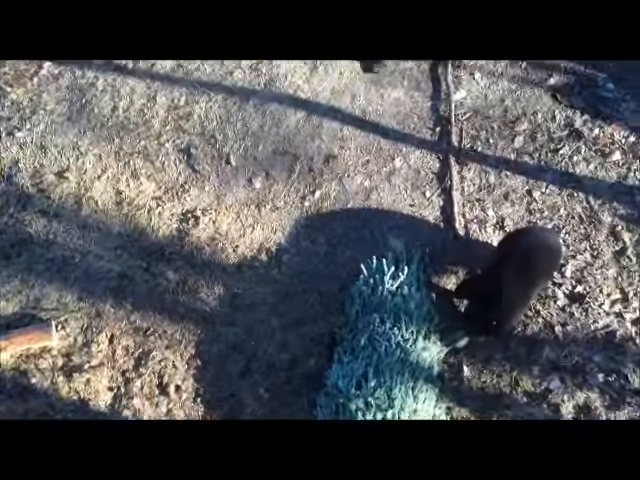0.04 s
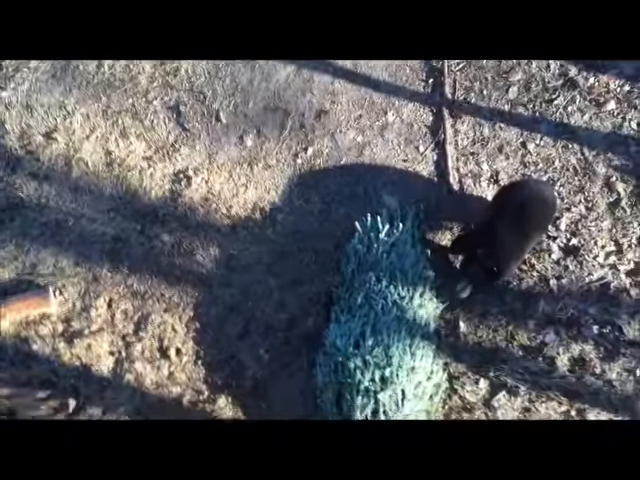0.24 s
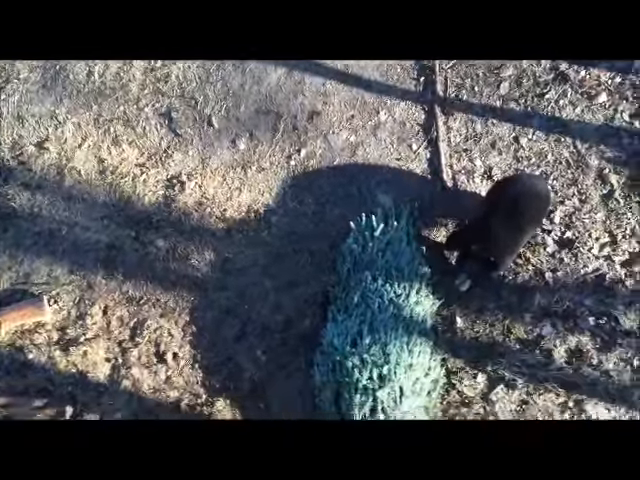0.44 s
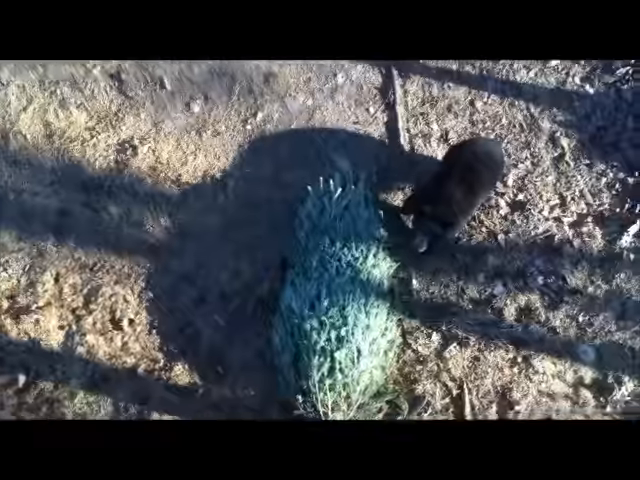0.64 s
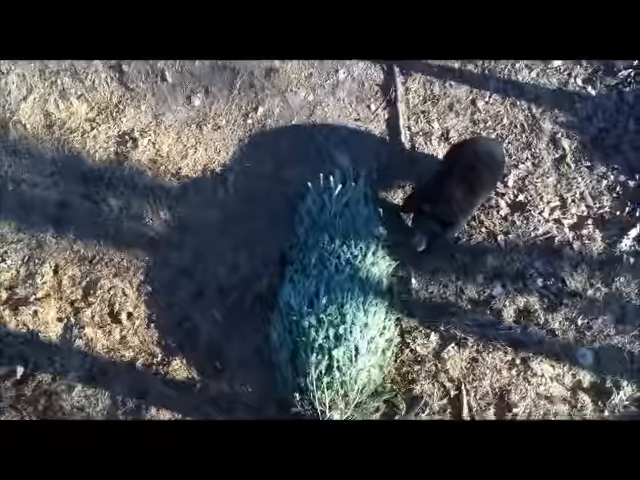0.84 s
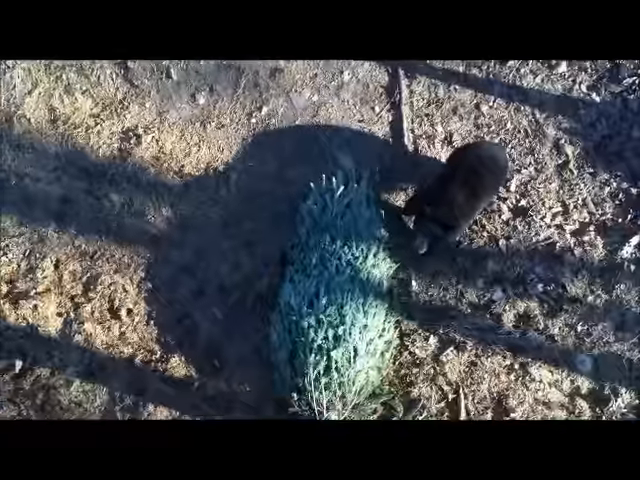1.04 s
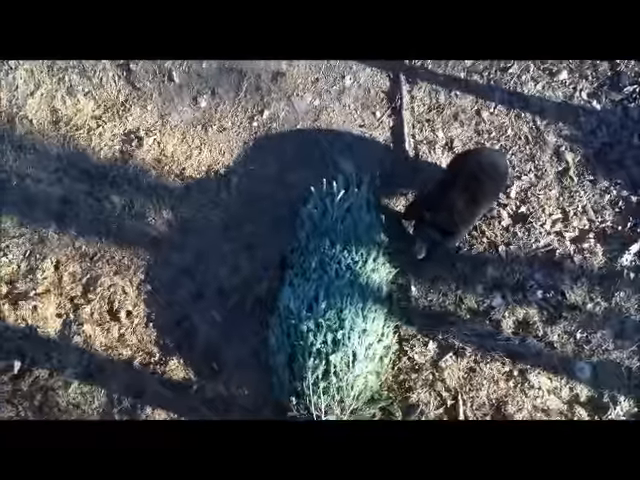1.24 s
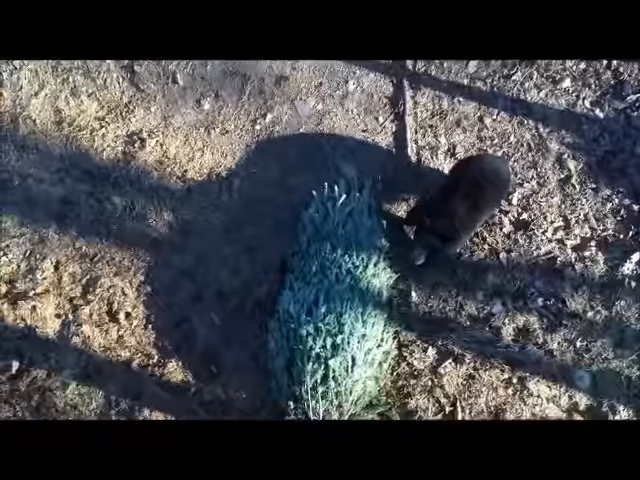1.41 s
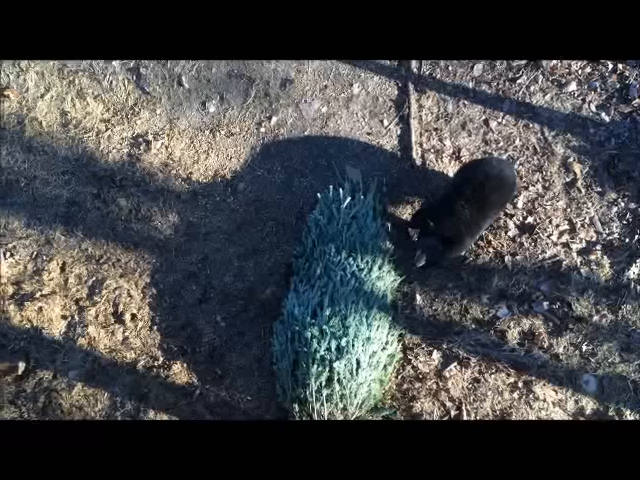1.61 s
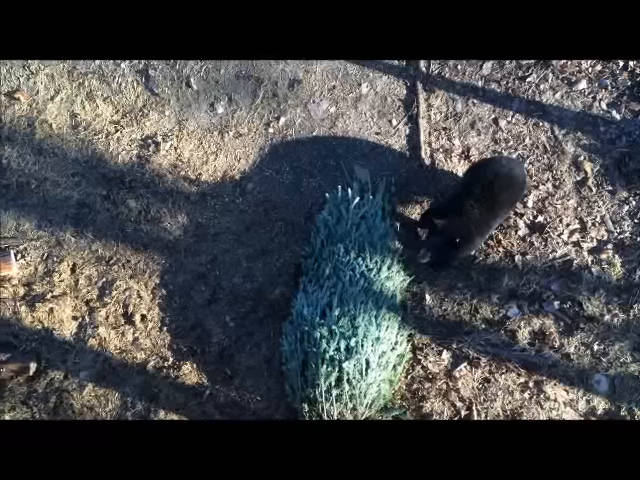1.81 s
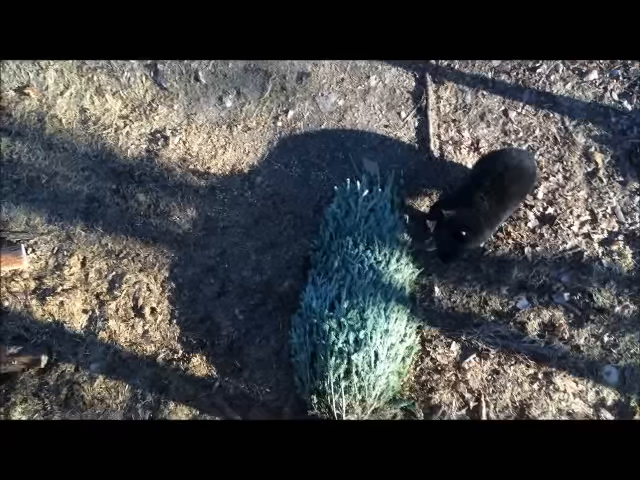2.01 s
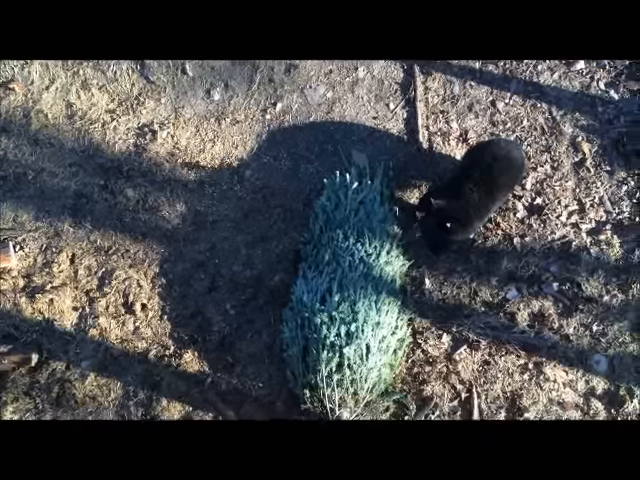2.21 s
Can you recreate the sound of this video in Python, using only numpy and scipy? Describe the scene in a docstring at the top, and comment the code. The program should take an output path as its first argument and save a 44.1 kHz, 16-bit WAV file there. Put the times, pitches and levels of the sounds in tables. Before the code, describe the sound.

A hand-held camera's plastic case clicks sharply, right at the microphone, followed by two quick hollow knocks and a softer click. Faint ticks and dry rustles follow over a quiet yard's low rumble and distant engine hum.

```python
"""A quiet yard rumbles and hums from the start, while fingers shift on a hand-held plastic camera.
After a faint tap, skin rubs and a fingertip knocks dully; at 0.6 s the case snaps with a sharp click.
Two quick, hollow knocks with a low thump follow, then a softer, thinner click of the case.
Then only faint ticks, light taps and dry rustles come and go, and the hum of distant engines swells."""
import sys
import numpy as np
from scipy import signal
from scipy.fft import rfft, irfft
from scipy.io import wavfile

SR = 44100
rng = np.random.default_rng(int(sys.argv[2]) if len(sys.argv) > 2 else 0)


def transcribe(signal):
    """Save signal, clipped to [-1, 1], as a 16-bit WAV file at the path in sys.argv[1]."""
    frames = np.atleast_2d(signal).T
    limited = np.clip(frames, -1, 1)
    pcm = np.round(limited * 32767).astype(np.int16)
    wavfile.write(sys.argv[1], SR, pcm)


N = 103635

# Sharp clicks of the case. Each row: start in seconds, level in dB, bass and treble corners in Hz.
CASE_CLICKS = [(0.6224, 0, 600, 17000), (0.7381, -11.5, 3370, 5200)]
# Resonances of the plastic case. Each row: frequency in Hz, half width in Hz, level in dB.
CASE_RESONANCES = [(776, 146, -6), (1153, 330, 5), (1836, 126, 1), (2750, 229, 15), (3476, 160, 13),
                   (3900, 280, 11), (4520, 206, 9), (5440, 560, 2), (6400, 197, 1.5), (8080, 450, -3.5),
                   (9100, 470, 1), (10500, 450, -3.5), (13170, 2400, -11.5)]
# Fingertip knocks and taps. Each row: start in seconds, level in dB, pitch in Hz, t60 in seconds.
FINGER_KNOCKS = [(0.2791, -40, 736, 0.023), (0.5958, -26, 460, 0.018), (0.717, -22.5, 454, 0.013),
                 (0.7241, -25, 462, 0.026), (1.5895, -47, 533, 0.0048), (1.7415, -40.5, 700, 0.016)]
# Hollow modes of a knock. Each row: multiple of its pitch, level in dB, multiple of its t60.
HOLLOW_MODES = [(1.002, 1.5, 1), (2.1, -16, 0.8)]
# Skin rubbing on the case. Each row: start in seconds, length in seconds, level in dB.
SKIN_RUBS = [(0.587, .011, -44.5), (0.716, .013, -52.5), (0.726, 0.021, -49)]
# Faint ticks. Each row: start in seconds, level in dB, treble corner in Hz.
FAINT_TICKS = [(0.2799, -31, 6950), (0.2877, -47.5, 5000), (0.5959, -30.5, 2580), (0.6025, -45, 6900),
               (0.6053, -44, 7020), (0.6103, -45, 6000), (0.6503, -53.5, 7000), (0.7170, -39, 5000),
               (0.747, -40, 3120), (1.064, -45.5, 4700), (1.59, -36, 7000), (1.7422, -44.5, 13900),
               (1.7462, -45.5, 13800)]
# Dry rustles. Each row: start and length in seconds, crackle level in dB, swish level in dB.
DRY_RUSTLES = [(-0.05, .15, -64, -72.5), (0.068, 0.16, -65.5, -74.5), (0.235, 0.075, -66, -67),
               (0.268, 0.066, -67, -75), (0.3, 0.13, -68, -80), (0.397, 0.17, -67, -75),
               (0.622, 0.046, -66, -77), (0.902, 0.064, -69, -78), (1.046, 0.043, -71, -93),
               (1.845, 0.035, -68, -78), (1.964, 0.031, -66, -80), (2.01, 0.059, -64.5, -84),
               (2.089, 0.021, -68, -87), (2.166, 0.11, -70.5, -87)]
# Tone colours of rub, tick, crackle, swish and open air. Each row: frequency in Hz, relative level in dB.
RUB_EQ = [(300, -1), (900, 4), (1500, -1), (2200, 3), (3200, -3.5), (4400, 1.5), (5400, -3.5),
          (6400, -13.5), (10500, -14), (15000, -14.5)]
TICK_EQ = [(300, 10), (800, 3.5), (1400, -2), (2000, -3), (3200, 0), (4300, -9), (6500, -5), (8500, -12.5),
           (15000, -2.5)]
CRACKLE_EQ = [(500, 4.5), (1500, 0.5), (3000, -0.5), (5000, -5), (7700, -8), (10000, -7.5), (12000, -10),
              (15000, -11.5)]
SWISH_EQ = [(4800, -18), (5700, -1), (6900, -1.5), (7900, -23)]
AIR_EQ = [(20, -23.5), (45, -11.5), (85, 1), (140, 0.5), (200, 1.5), (260, -6.5), (320, -6), (400, -12.5),
          (600, -14.5), (950, -18), (1500, -24.5), (2100, -34), (3000, -39), (4500, -40.5), (8000, -42),
          (15400, -46)]
# Rise and fall of the distant hum. Each row: time in seconds, level in dB.
HUM_LEVELS = [(0, -59), (0.25, -54), (0.6, -57.5), (0.85, -63), (1.15, -51), (1.4, -55), (1.52, -51),
              (1.68, -51.5), (1.88, -47.5), (2.05, -55.5), (2.35, -51)]
# Weaker far-off tones. Each row: start and end in seconds, pitch in Hz, level in dB.
FAR_TONES = [(0.017, 1.01, 161, -54), (0.26, 1.33, 281, -59.5), (1.35, 2.15, 247, -58),
             (-0.1, 0.92, 541, -67.5)]

RATTLE_DB, RATTLE_T60_S, RATTLE_TREBLE_HZ = -25, .009, 8970
THUMP_HZ, THUMP_DB, THUMP_T60_S = 186, -14, .016
CRACK_DB, SCATTER_DB, SCATTER_T60_S, TAIL_DB, TAIL_T60_S = 10, -3, 0.0056, -14, 0.049
AIR_DB, SWELL_DB, SWELL_RATE_HZ = -49.5, 0.43, 14
HUM_HZ, WAVER_HZ, WAVER_RATE_HZ, FLUTTER_DB = 209.6, 1.5, 5.2, 1.5


def clicks(size=4096):
    """The plastic case snaps and rattles faintly; each contact has its own brightness."""
    out, t = np.zeros(N), np.arange(size) / SR
    for start, db, bass_hz, treble_hz in CASE_CLICKS:
        rattle = soften(rng.standard_normal(size), RATTLE_TREBLE_HZ)
        rattle *= amp(RATTLE_DB - 60 * t / RATTLE_T60_S)
        bass_cut = signal.butter(1, bass_hz, "high", fs=SR)
        thin = signal.lfilter(*bass_cut, case_snap(size) + rattle)
        add(out, start, amp(db) * soften(thin, treble_hz))
    return out


def case_snap(size):
    """One sharp impulse starts all the case's resonances at once, and they die away."""
    f = abs(np.fft.fftfreq(size, 1 / SR))
    peaks = [amp(db) / (1 + ((f - hz) / width) ** 2) for hz, width, db in CASE_RESONANCES]
    gain = np.sqrt(sum(peak ** 2 for peak in peaks))
    minimum_phase = np.exp(signal.hilbert(np.log(gain)).conj())  # packs the energy into the attack
    return np.fft.ifft(minimum_phase).real


def knocks(contact_s=0.001, size=256):
    """A fingertip's soft push sets off a low thump and hollow modes, pitched by where it lands."""
    out = np.zeros(N)
    push = np.sin(np.pi * np.minimum(np.arange(size) / SR / contact_s, 1))
    thump = ring([(THUMP_HZ, THUMP_DB, THUMP_T60_S)])  # the whole camera gives way
    for start, db, hz, t60 in FINGER_KNOCKS:
        hollow = ring([(hz * ratio, mode_db, t60 * share) for ratio, mode_db, share in HOLLOW_MODES])
        add(out, start, amp(db) * np.convolve(hollow + thump, push / push.sum()))
    return out


def ring(modes, size=4096):
    """Dying sines of a struck object; neighbouring modes swing in opposite directions."""
    t = np.arange(size) / SR
    return sum((-1) ** k * amp(db - 60 * t / t60) * np.sin(2 * np.pi * hz * t)
               for k, (hz, db, t60) in enumerate(modes))


def ticks(size=2048):
    """Each tiny tick is one crack, a brief scatter and a faint tail."""
    out, t = np.zeros(N), np.arange(size) / SR
    crack = amp(CRACK_DB) * (t == 0)
    decay = amp(SCATTER_DB - 60 * t / SCATTER_T60_S) + amp(TAIL_DB - 60 * t / TAIL_T60_S)
    for start, db, treble_hz in FAINT_TICKS:
        tick = crack + decay * rng.choice([-1., 1.], size)
        add(out, start, amp(db) * soften(tick, treble_hz))
    return colour(out, TICK_EQ)


def friction(strokes, eq, slips_per_s=4000, slip_share=.35):
    """Rubbing: dense little slips and smooth hiss, under strokes that swell and fade."""
    t = np.arange(N) / SR
    envelope = sum(amp(db) * np.sin(np.pi * np.clip((t - start) / length, 0, 1))
                   for start, length, db in strokes)
    slips = unit_rms(rng.standard_normal(N) * (rng.random(N) < slips_per_s / SR))
    texture = np.sqrt(slip_share) * slips + np.sqrt(1 - slip_share) * rng.standard_normal(N)
    return colour(envelope * texture, eq)


def rustles():
    """Each rustle is a broad crackle with a narrower, cloth-like swish."""
    crackle = friction([(start, length, db) for start, length, db, _ in DRY_RUSTLES], CRACKLE_EQ)
    swish = friction([(start, length, db) for start, length, _, db in DRY_RUSTLES], SWISH_EQ)
    return crackle + swish


def yard_air():
    """A bed of low outdoor rumble and thin hiss whose level trembles slightly."""
    bed = unit_rms(colour(rng.standard_normal(N), AIR_EQ))
    return bed * amp(AIR_DB + SWELL_DB * wander(SWELL_RATE_HZ))


def distant_engines(fade_s=0.11):
    """One engine hum rises and falls while weaker tones fade in and out."""
    t = np.arange(N) / SR
    out = drone(HUM_HZ) * amp(np.interp(t, *np.transpose(HUM_LEVELS)))
    for start, end, hz, db in FAR_TONES:
        fade = np.clip(np.minimum(t - start, end - t) / fade_s, 0, 1)
        out += drone(hz) * amp(db) * fade
    return out


def drone(hz):
    """A sine that wavers a little in pitch and level, rms 1."""
    turns = np.cumsum(hz + WAVER_HZ * wander(WAVER_RATE_HZ)) / SR + rng.random()
    flutter = amp(FLUTTER_DB * wander(WAVER_RATE_HZ))
    return unit_rms(np.sin(2 * np.pi * turns) * flutter)


def wander(rate_hz):
    """Random drift, mostly slower than rate_hz, rms 1."""
    f = np.fft.rfftfreq(N, 1 / SR)
    return unit_rms(irfft(rfft(rng.standard_normal(N)) / (1 + (f / rate_hz) ** 4), N))


def colour(x, eq):
    """Shapes a sound with an EQ curve, keeping the power of white noise."""
    hz, db = np.transpose(eq)
    f = np.fft.rfftfreq(len(x), 1 / SR)
    gain = amp(np.interp(np.log(f + 1), np.log(hz), db))
    return irfft(rfft(x) * unit_rms(gain), len(x))


def soften(x, corner_hz):
    """Rolls off the treble, as a softer contact does."""
    return signal.lfilter(*signal.butter(2, corner_hz, fs=SR), x)


def amp(db):
    """Decibels to gain."""
    return 10 ** (np.asarray(db) / 20)


def unit_rms(x):
    """Scales to rms 1."""
    return x / np.sqrt(np.mean(x ** 2) + 1e-20)


def add(mix, start_s, sound):
    """Drops a sound into the mix at start_s."""
    part = mix[round(start_s * SR):][:len(sound)]
    part += sound[:len(part)]


def scene():
    """Close handling sounds up front, the yard behind them, in mono."""
    handling = clicks() + ticks() + knocks() + friction(SKIN_RUBS, RUB_EQ) + rustles()
    return (handling + yard_air() + distant_engines())[None]


def record(dry, low_cut_hz=25, high_cut_hz=15450):
    """A gentle low cut and a steep high cut trim both ends of the mix."""
    trimmed = signal.sosfilt(signal.butter(2, low_cut_hz, "high", fs=SR, output="sos"), dry)
    high_cut = signal.firwin(401, high_cut_hz, window=("kaiser", 7), fs=SR)
    return signal.oaconvolve(trimmed, high_cut[None], "same")


dry = scene()
out = record(dry)
transcribe(out)
```